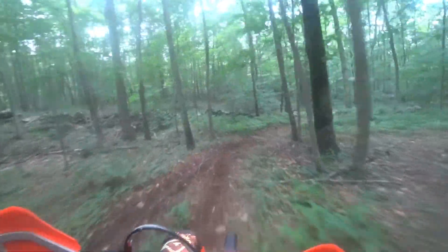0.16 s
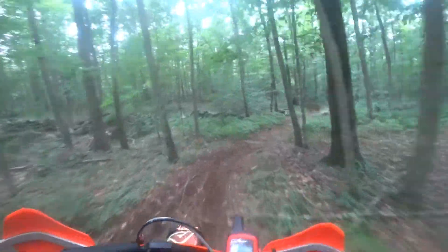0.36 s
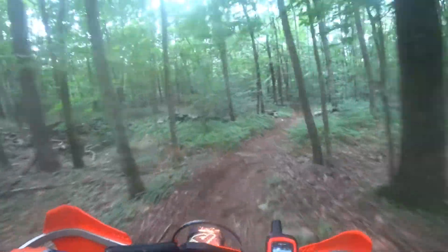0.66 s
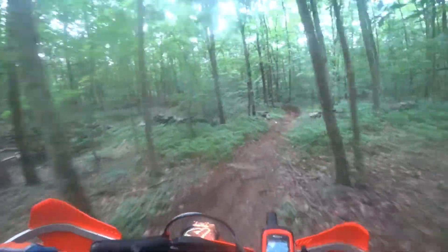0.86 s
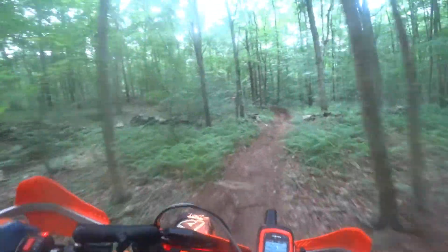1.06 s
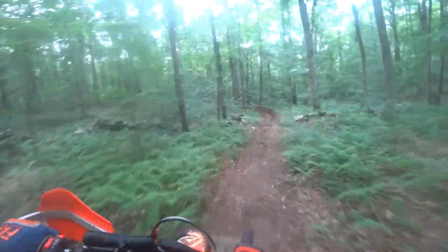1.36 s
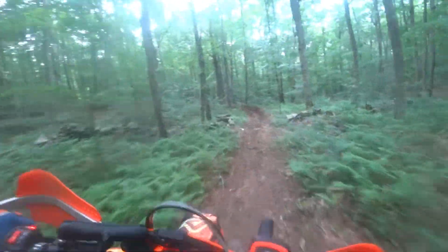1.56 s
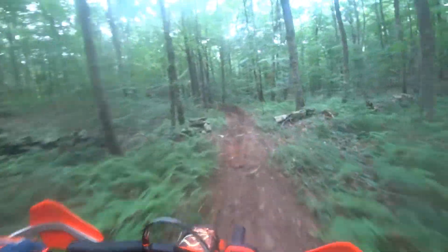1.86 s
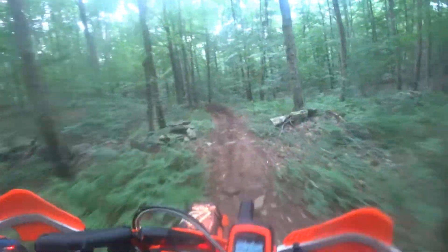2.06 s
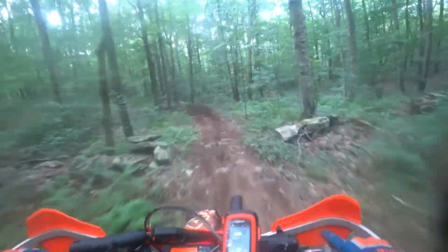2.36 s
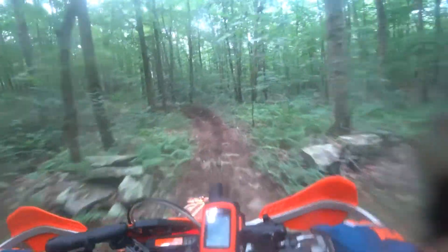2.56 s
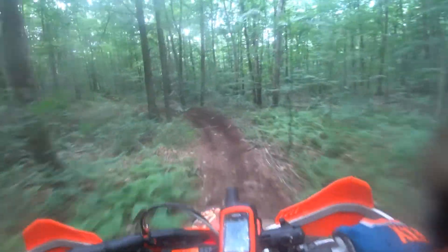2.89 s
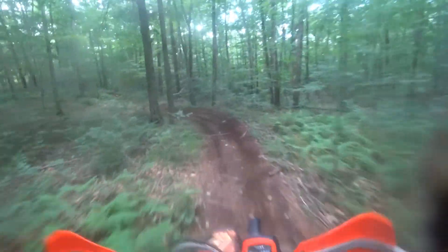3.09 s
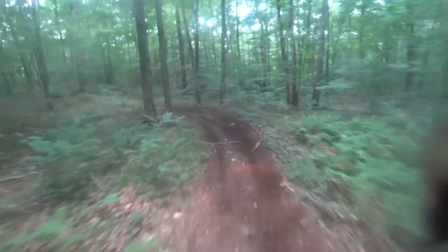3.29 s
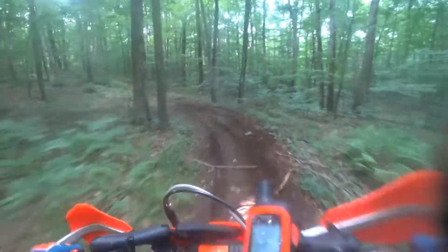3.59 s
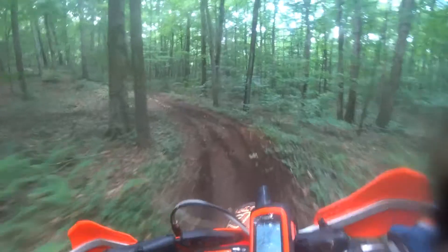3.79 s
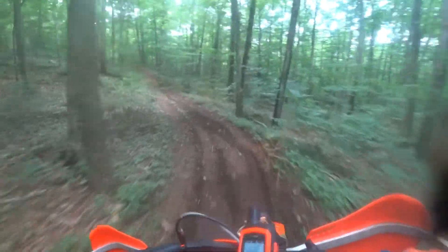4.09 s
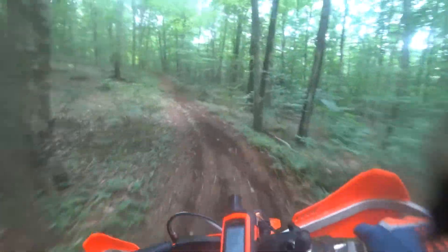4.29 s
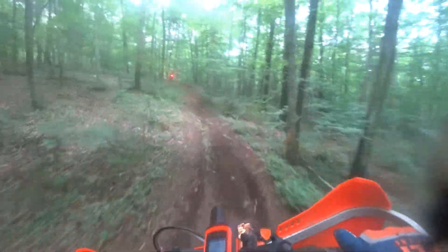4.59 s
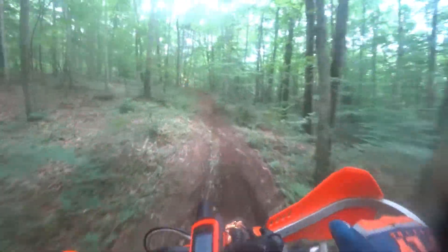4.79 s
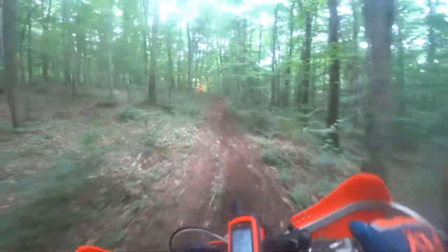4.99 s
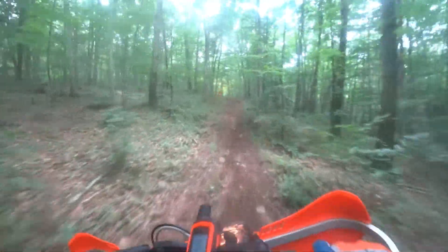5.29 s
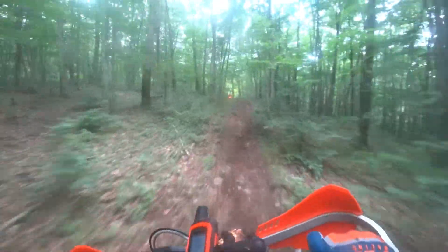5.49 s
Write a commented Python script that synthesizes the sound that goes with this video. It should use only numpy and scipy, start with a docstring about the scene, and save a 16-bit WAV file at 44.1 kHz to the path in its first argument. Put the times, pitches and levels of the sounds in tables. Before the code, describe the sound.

Close to a rider's helmet microphone, a dirt bike coasts with low buffeting air, faint droning engine and stray metallic pings. From just after one second come several raspy throttle blips. Then the throttle shuts, with deep thumps, chassis knocks and tiny brake squeaks, before the two-stroke catches and pulls upward in revs to the end.

```python
"""First a dirt bike coasts over a rough forest trail: a dull thud, rumbling air, a faint engine, odd pings.
Then come throttle blips, bumps with the throttle shut and short brake squeaks, and a pull from low revs.
Each firing of the two-stroke booms in the exhaust, pings in the pipe and rasps with gas and thin metal.
Coloured noise makes the air and the clatter; kicks set the ringing parts going.
All is heard from the rider's helmet, where air and jolts shake the microphone mount."""
import sys
import numpy as np
from scipy import signal
from scipy.fft import rfft, irfft, next_fast_len
from scipy.io import wavfile
from scipy.ndimage import uniform_filter1d

SR = 44100
rng = np.random.default_rng(int(sys.argv[2]) if len(sys.argv) > 2 else 0)


def pcm_store(signal):
    """Save signal as 16-bit PCM."""
    levels = np.round(np.clip(np.atleast_2d(signal), -1, 1) * 32767)
    wavfile.write(sys.argv[1], SR, levels.astype(np.int16).T)


N = 249165
TIME = np.arange(N) / SR


def from_db(db):
    """Turns decibels into a factor."""
    return 10 ** (np.asarray(db) / 20)


def rms_one(x):
    """Scales a sound to an overall rms of 1."""
    return x / np.sqrt(np.mean(x ** 2) + 1e-20)


def in_time(rows):
    """Reads each column of a time curve at every sample."""
    s, *columns = np.transpose(rows)
    return [np.interp(TIME, s, c) for c in columns]


def at_hz(points, hz):
    """Reads a spectrum on a log-frequency axis."""
    f, value = np.transpose(points)
    return np.interp(np.log(hz + 1), np.log(f), value)


# stereo width of all noises: f/Hz, side minus centre level/dB
STEREO_WIDTH = [(30, -18.5), (65, -5.5), (120, -1.5), (200, 7), (340, 11.5), (600, 12), (980, 7),
                (1300, 14), (1900, 2), (3500, 1.5), (4300, 5), (5600, 0.5), (10000, -4)]


def noise(spectrum):
    """Stereo noise of a given colour, silent from the spectrum's last frequency up; rms 1."""
    size = next_fast_len(N)
    hz = np.arange(size // 2 + 1) * SR / size
    width = from_db(at_hz(STEREO_WIDTH, hz))
    colour = from_db(at_hz(spectrum, hz)) * (hz < spectrum[-1][0])
    centre, side = rfft(rng.standard_normal((2, size))) * colour / np.hypot(1, width)
    left_right = [centre + width * side, centre - width * side]
    return rms_one(irfft(left_right, size)[:, :N])


def clicks(seconds, sizes):
    """Single-sample kicks at given times."""
    out = np.zeros(N)
    places = np.round(np.asarray(seconds) * SR).astype(int)
    np.add.at(out, np.clip(places, 0, N - 1), sizes)
    return out


def puffs(kicks, rise_s, fall_s):
    """Two smoothing steps turn each kick into a swell that dies away."""
    up, down = np.exp(-1 / (rise_s * SR)), np.exp(-1 / (fall_s * SR))
    return signal.lfilter([1 - up], [1, -up - down, up * down], kicks + 1e-18)


def body(drive, modes, sharpen=0.0):
    """Steep double-pole resonances, each reaching the two ears with its own phase and strength."""
    out, ears = np.zeros((2, N)), np.array([[.5], [-.5]])
    for hz, width_hz, db, phase, pan_db in modes:
        r = np.exp(-np.pi * width_hz / SR)
        pole = r * np.exp(2j * np.pi * hz / SR)
        # extra turning that bends the pitch by the share "sharpen"
        glide = np.exp(2j * np.pi * hz * np.cumsum(sharpen) / SR)
        ring = signal.lfilter([(1 - r) ** 2], [1, -2 * pole, pole ** 2], drive / glide + 1e-18)
        ring = glide * ring
        out += from_db(db + pan_db * ears) * np.real(ring * np.exp(-1j * phase * ears))
    return out


def struck(kicks, modes):
    """A body ringing so that a unit kick peaks at 1."""
    return body(kicks, modes) / np.abs(body(clicks([0], [1]), modes)).max()


def evened(x, window_s):
    """Holds the level of a noise steady by dividing by its short-term rms."""
    power = uniform_filter1d(np.mean(x ** 2, axis=0), max(int(window_s * SR), 2))
    return x / np.sqrt(power + 1e-6)


def burst(seconds, sizes, rough):
    """Pressure kicks, each trailed by a puff of turbulence; rough is the share of turbulence."""
    kicks = clicks(seconds, sizes)
    return kicks + rough * puffs(kicks, rise_s=.0008, fall_s=.006) * rng.standard_normal(N)


def dead_centres(speed, start, end):
    """The times at which the piston passes the top, once a turn from start to end."""
    turned = np.cumsum(speed * ((TIME > start) & (TIME < end))) / SR
    return TIME[1:][np.diff(np.ceil(turned)) > 0]


def voice(modes, pulling):
    """Picks the strengths that the resonances have in a blip or in the long pull."""
    return [(hz, width, pull_db if pulling else blip_db, phase, pan)
            for hz, width, blip_db, pull_db, phase, pan in modes]


TYPICAL_TURNS_PER_S = 45  # firing rate at which the levels of boom and ping hold


def resound(drive, modes, extra_db, sharpen=0.0):
    """Resonances of alternating sign, each with an extra gain; a run of unit kicks gives about rms 1."""
    out, power = 0, 0
    for k, (mode, db) in enumerate(zip(modes, extra_db)):
        gain = from_db(db)
        out = out + (-1) ** k * gain * body(drive, [mode], sharpen)
        power = power + (gain * from_db(mode[2])) ** 2 * np.pi * mode[1] / 8
    return out * SR / np.sqrt(power * TYPICAL_TURNS_PER_S)


# air buffeting the microphone: t/s, level/dB
AIR_LEVEL = [(0, -31), (.2, -31.5), (.5, -36), (.75, -39.5), (1.25, -32.5), (1.95, -39.5), (2.25, -31),
             (2.5, -32), (2.68, -27), (2.96, -30.5), (3.08, -34.5), (3.2, -28), (3.45, -33.5),
             (3.75, -35.5), (4.25, -38), (4.8, -49), (5.16, -30), (5.65, -55)]
# colour of the air noise: f/Hz, relative level/dB per Hz
AIR_COLOUR = [(25, 18), (48, 0.5), (64, 5.5), (85, -2), (125, 2.5), (180, 0), (280, -7.5), (500, -43),
              (1200, -80)]


def air():
    """Air tumbles over the microphone ports: deep noise that follows a level curve."""
    level_db, = in_time(AIR_LEVEL)
    return evened(noise(AIR_COLOUR), window_s=0.052) * from_db(level_db)


# sway of the mount between jolts: t/s, level/dB
SWAY_LEVEL = [(0, -24.5), (.7, -29.5), (1.0, -35), (1.7, -28.5), (2.2, -30.5), (2.48, -32.5), (2.65, -23),
              (3.05, -32), (3.4, -25), (3.6, -17), (4.0, -27), (4.3, -29), (4.5, -25), (4.75, -27.5),
              (5.65, -25.5)]
# colour of the sway: f/Hz, relative level/dB per Hz
SWAY_COLOUR = [(12, 2.5), (24, 7.5), (33, -22), (40, 1.5), (50, -12.5), (66, -14), (90, -33), (150, -90)]
# bumps in the trail that set the mount ringing: t/s, peak level/dB
MOUNT_JOLTS = [(0.168, -27), (0.483, -23.5), (1.335, -25), (1.527, -20.5), (1.806, -13.5), (2.04, -16.5),
               (2.299, -21), (2.773, -19.5), (3.2, -22.5), (3.442, -6), (3.647, -12.5), (3.791, -16.5),
               (4.361, -18), (4.859, -22)]
# low resonance of the mount: f/Hz, width/Hz, level/dB, left-ear lag/rad, left minus right level/dB
MOUNT_RESONANCE = [(33.22, 9, 0, 0.77, -2.5)]


def mount():
    """The microphone mount sways as very low noise and rings at its own low pitch after each jolt."""
    sway_db, = in_time(SWAY_LEVEL)
    s, jolt_db = np.transpose(MOUNT_JOLTS)
    sway = evened(noise(SWAY_COLOUR), window_s=0.074) * from_db(sway_db)
    return sway + struck(clicks(s, from_db(jolt_db)), MOUNT_RESONANCE)


# the suspension taking a bump: t/s, peak level/dB
SUSPENSION_THUMPS = [(0.148, -37), (0.469, -43), (1.216, -45), (1.383, -28), (2.069, -40), (2.6, -28),
                     (3.421, -17), (3.48, -24), (3.81, -25), (3.937, -30), (4.361, -33)]
# its resonance: f/Hz, width/Hz, level/dB, left-ear lag/rad, left minus right level/dB
SUSPENSION_RESONANCE = [(74, 47, 0, 2.9, 0.93)]


def suspension():
    """Each bump kicks one low, quickly dying resonance."""
    s, level_db = np.transpose(SUSPENSION_THUMPS)
    return struck(clicks(s, from_db(level_db)), SUSPENSION_RESONANCE)


# the chassis hitting roots and stones: t/s, thud peak level/dB, click strength/dB
CHASSIS_KNOCKS = [(0.061, -21, -57), (1.389, -40, -58), (1.993, -26, -43), (2.679, -17.5, -56),
                  (2.955, -38, -68), (3.138, -22, -61), (3.216, -25, -65), (3.252, -31, -59),
                  (3.409, -26, -57), (3.433, -14.5, -47), (4.201, -25, -55), (5.154, -23, -49)]
# its resonances: f/Hz, width/Hz, relative level/dB, left-ear lag/rad, left minus right level/dB
CHASSIS_RESONANCES = [(68, 60, -5, 2.3, 9), (152.5, 132, -2, 2.53, 1), (292, 102, -3, 2.62, -1.5)]


def knocks():
    """The chassis thuds dully, and a moment later its loose parts click as a tiny puff of noise."""
    s, thud_db, click_db = np.transpose(CHASSIS_KNOCKS)
    thud = struck(clicks(s, from_db(thud_db)), CHASSIS_RESONANCES)
    click = puffs(clicks(s + 0.0058, from_db(click_db)), rise_s=0.0002, fall_s=0.0031)
    return thud + click * noise([(800, -18), (1500, -3), (3000, 6), (6000, -6), (11200, -5)])


BRAKE_HZ = 3615
# brake squeaks: t/s, length/s, level/dB
BRAKE_SQUEAKS = [(3.163, 0.01, -67), (3.184, 0.0086, -81), (3.237, 0.008, -62), (3.97, 0.0061, -60.5)]
# the pad rubbing lightly: t/s, level/dB
BRAKE_RUB_LEVEL = [(3.5, -90), (3.65, -76), (4.3, -73), (4.6, -75), (4.85, -66), (5.3, -65), (5.4, -90)]


def brake(width_hz=70, rub_width_hz=260, flutter_per_s=40):
    """A pad sets the disc singing for a moment, then rubs with a scattered, fluttering ring."""
    swell = sum(from_db(db) * np.exp(-.5 * ((TIME - s) / length) ** 2) for s, length, db in BRAKE_SQUEAKS)
    squeak = swell * rms_one(body(rng.standard_normal(N), [(BRAKE_HZ, width_hz, 0, 1.3, 0)]))
    touches = puffs(1.0 * (rng.random(N) < flutter_per_s / SR), rise_s=0.0023, fall_s=0.011)
    rub = rms_one(body(touches * rng.standard_normal(N), [(BRAKE_HZ, rub_width_hz, 0, 1.3, 0)]))
    return squeak + rub * from_db(in_time(BRAKE_RUB_LEVEL)[0])


IDLE_TURNS_PER_S, PULL_START_S = 31.2, 4.651
# levels at idle, growth with the revs, and extra drone in the pull
DRONE_DB, DRONE_DB_PER_OCTAVE, DRONE_PULL_DB = -41.5, 4, 2.5
CLATTER_DB, CLATTER_DB_PER_OCTAVE = -54, 1
# levels that do not follow the revs
PUMPING_DB, METAL_RATTLE_DB, MURMUR_DB = -50.5, -60, -60
MURMUR_ORDER = 4  # cycles per turn
# colours of the drone and of piston and chain: f/Hz, relative level/dB per Hz
DRONE_COLOUR = [(120, 1.5), (220, -3), (350, 5.5), (455, 9), (560, 2), (650, 4.5), (780, -3), (950, 1),
                (1100, -3), (1300, -6), (1700, -32), (3000, -67)]
CLATTER_COLOUR = [(700, 2), (1300, 5.5), (1650, 8), (1850, 1.5), (2300, 0), (3050, -4), (3550, -1.5),
                  (4000, -6.5), (4700, -3.5), (5700, -5.5), (7600, -17), (9700, -18.5), (9920, -30),
                  (10150, -12.5), (11200, -24)]
# thin metal of cylinder and pipe wall, which also rings under a firing:
# f/Hz, width/Hz, relative level/dB, left-ear lag/rad, left minus right level/dB
THIN_METAL = [(1832, 66, 4.5, 2.5, -7), (2180, 147, -1.5, 3.45, 3.5), (3478, 96, -8, 1.33, 0.5),
              (5480, 58, -17, 4.9, -24), (9850, 45, -12.5, 1.3, 9.5)]


def coasting(speed, throb=0.67, rattle=0.32):
    """The turning engine pumps air, drones and murmurs while piston and chain rattle; no firing needed."""
    octaves = np.log2(speed / IDLE_TURNS_PER_S)
    turns = dead_centres(speed, 0, TIME[-1])
    beats = clicks(turns, np.ones(len(turns)))
    strokes = beats * from_db(rng.uniform(-18.4, 8, N))
    links = (rng.random(N) < 110 / SR) * from_db(rng.uniform(-8, 8, N))  # about 110 chain kicks a second

    drone = rms_one((1 + throb * puffs(strokes, rise_s=0.00045, fall_s=0.023)) * noise(DRONE_COLOUR))
    drone_db = DRONE_DB + DRONE_DB_PER_OCTAVE * octaves + DRONE_PULL_DB * (TIME > PULL_START_S)
    rattling = 1 + rattle * puffs(strokes + links, rise_s=0.00013, fall_s=0.0088)
    clatter = rms_one(rattling * noise(CLATTER_COLOUR))
    clatter_db = CLATTER_DB + CLATTER_DB_PER_OCTAVE * octaves

    tone = np.sin(2 * np.pi * MURMUR_ORDER * np.cumsum(speed) / SR + np.array([[0], [2.0]]))
    murmur = rms_one(puffs(beats * rng.random(N), rise_s=0.01, fall_s=0.0051) * tone)
    ringing = rms_one(body(strokes + links, THIN_METAL))
    # unfired strokes puff through the exhaust
    pumping = resound(beats * rng.random(N), voice(EXHAUST_MODES, False), np.zeros(len(EXHAUST_MODES)))

    steady = (pumping * from_db(PUMPING_DB) + ringing * from_db(METAL_RATTLE_DB)
              + murmur * from_db(MURMUR_DB))
    return steady + drone * from_db(drone_db) + clatter * from_db(clatter_db)


# stray firings with the throttle shut, before the offsets below: t/s, ping level/dB, crack level/dB
STRAY_FIRINGS = [(0.059, -37, -60), (0.407, -43, -72), (0.555, -37, -59), (0.724, -37.5, -56.5),
                 (0.915, -45, -64), (1.053, -39, -58), (2.683, -38, -55), (2.841, -35.5, -54.5),
                 (3.005, -38, -58.5), (3.119, -36.5, -58.5), (3.269, -42.5, -67), (3.389, -36, -61),
                 (3.539, -36, -57), (3.742, -42.5, -67), (3.896, -34, -55), (4.07, -33, -55),
                 (4.283, -37, -57), (4.433, -33.5, -60), (4.572, -31.5, -53.5)]


def stray_firings(kick_db=-5, spit_db=15.0, boom_db=-5, rough=0.046, varied_db=2.5):
    """A lone weak firing pings the pipe in a varying colour and thumps the exhaust in a short spit of gas."""
    s, ping_db, crack_db = np.transpose(STRAY_FIRINGS)
    drive = burst(s - .001, from_db(ping_db + kick_db), rough)
    variation_db = varied_db * rng.standard_normal((len(s), len(PIPE_MODES)))
    colours = [np.interp(TIME, s, column) for column in variation_db.T]
    ping = resound(drive, voice(PIPE_MODES, False), colours)
    boom = resound(drive, voice(EXHAUST_MODES, False), np.zeros(len(EXHAUST_MODES)))
    spit = puffs(clicks(s - .007, from_db(crack_db + spit_db)), rise_s=0.0026, fall_s=0.016)
    gas = noise([(300, 20.0), (900, 23.5), (1500, 13), (3000, 4.0), (5600, 9.5), (7500, -2.0),
                 (11200, -4.0)])
    return ping + from_db(boom_db) * boom + spit * gas


RUN_ON_S = 0.091  # firing goes on this long after the throttle shuts


def firings(speed):
    """The engine catches as the throttle opens and runs on briefly after it shuts."""
    starts = [blip[0] for blip in THROTTLE_BLIPS] + [PULL_START_S]
    # a run stops at least half an idle turn before the next one starts
    ends = [min(blip[1] + RUN_ON_S, following - .5 / IDLE_TURNS_PER_S)
            for blip, following in zip(THROTTLE_BLIPS, starts[1:])]
    runs = zip(starts, ends + [TIME[-1]])
    return np.concatenate([dead_centres(speed, start, end) for start, end in runs])


FIRST_FIRING_DB = -4.5  # shortfall at the start of a blip
# short openings of the throttle: opening t/s, shutting t/s, build-up/s,
# then on shutting: boom level/dB, ping level/dB, rasp level/dB
THROTTLE_BLIPS = [(0.0, 0.28, 0.018, -43, -51.5, -64.5), (1.222, 1.312, .003, -29, -40.5, -51.5),
                  (1.465, 1.643, 0.0092, -25, -40, -48.5), (1.78, 1.898, 0.079, -22.5, -37, -49),
                  (2.001, 2.14, 0.0043, -31, -46, -56.5), (2.1411, 2.394, 0.0034, -24.5, -38.5, -49.5)]
# effort in the long pull: t/s, boom level/dB, ping level/dB, rasp level/dB
PULL_EFFORT = [(4.651, -24, -38.5, -44.5), (4.7, -20.5, -35.5, -51), (4.8, -28.5, -38.5, -52),
               (4.98, -27.5, -40.5, -53), (5.08, -24, -38.5, -53), (5.27, -25.5, -40.5, -52.5),
               (5.43, -27.5, -40.5, -54), (5.57, -24, -36.5, -50), (5.65, -26.5, -34.5, -50)]
# growth with the revs [dB per octave] of boom, ping, rasp
REV_GROWTH = [3.5, 9, 9]
# dying away once the throttle shuts [dB per s] of boom, ping, rasp
SHUT_RELEASE = [229, 136, 107]


def effort(speed):
    """Gains of boom, ping and rasp: a build-up, growth with the revs, a release."""
    growth_db, release_db = np.array(REV_GROWTH)[:, None], np.array(SHUT_RELEASE)[:, None]
    gains = from_db(in_time(PULL_EFFORT)) * (TIME >= PULL_START_S)
    for start, shut, build_s, *level_db in THROTTLE_BLIPS:
        octaves = np.log2(speed / np.interp(shut, TIME, speed)) * (TIME < shut)
        weak_db = FIRST_FIRING_DB * (1 - np.clip((TIME - start) / build_s, 0, 1) ** 2)
        db = np.array(level_db)[:, None] + weak_db + growth_db * octaves
        db = db - release_db * np.clip(TIME - shut, 0, 1)
        gains = np.maximum(gains, from_db(db) * (TIME >= start))
    return gains


# the honk while the engine lugs at the start of the pull
LUG_HZ, LUG_DB, LUG_S = 330, 6.5, 0.58
HEAT_RISE_PER_OCTAVE = 0.16  # share of pitch
# exhaust resonances: f/Hz, width/Hz, relative level/dB in blips, relative level/dB in the pull,
# left-ear lag/rad, left minus right level/dB
EXHAUST_MODES = [(242, 97, 0.5, -2.5, 2.76, 2), (331.3, 25, 1, 3.5, 2.76, 2.5),
                 (411.3, 103, 2, -1.5, 2.73, -0.5), (508, 65, -8, -7, 3.02, -4.5),
                 (666, 125, -8.5, -8, 3.537, -1)]
# voice against revs; the middle hollows out at high revs:
# crank speed/turns per s, low level/dB, middle level/dB, high level/dB
EXHAUST_VOICING = [(32.8, 1, 5, -2), (37.4, -4, -2.5, -1.5), (45, 1.5, 3.5, -0.5), (48, 3.5, 0, 4),
                   (54, 0.5, 1, 4)]
# centres of the low, middle and high regions: f/Hz
VOICING_CENTRES = [260, 340, 420]


def exhaust(drive, speed, pulling, lug_octaves=0.11):
    """The modes swell and fade with the revs, sharpen as the gas heats, and honk while the engine lugs."""
    revs, *regions = np.transpose(EXHAUST_VOICING)
    regions_db = np.array([np.interp(speed, revs, column) for column in regions])
    lug_db = LUG_DB * pulling * np.exp(-((TIME - PULL_START_S) / LUG_S) ** 2)
    extra_db = []
    for hz, *_ in EXHAUST_MODES:
        shares = np.array([np.interp(hz, VOICING_CENTRES, row) for row in np.eye(len(regions))])
        closeness = np.exp(-(np.log2(hz / LUG_HZ) / lug_octaves) ** 2)
        extra_db.append(shares @ regions_db + lug_db * closeness)
    # heat is how far the revs stand above their mean over the last quarter second
    recent = uniform_filter1d(speed, SR // 4, mode="nearest", origin=SR // 8 - 1)
    heat = np.log2(speed / recent)
    return resound(drive, voice(EXHAUST_MODES, pulling), extra_db, HEAT_RISE_PER_OCTAVE * heat)


PING_ROUGH = .014  # share of turbulence in a kick
# the pipe's far end repeats the ping
PIPE_ECHO_S, PIPE_ECHO_DB = 0.007, -6
# each kick reaches the tailpipe a moment later; the open end sends it back inverted
TAILPIPE_S, REFLECTION_S, REFLECTION_DB = 0.002846, 0.005546, -8
# the higher pipe resonance reaches its level at this crank speed
PIPE_TOP_DB, PIPE_TOP_TURNS_PER_S, PIPE_TOP_DB_PER_OCTAVE = -8.5, 57, 22
# pipe wall resonances: f/Hz, width/Hz, relative level/dB in blips, relative level/dB in the pull,
# left-ear lag/rad, left minus right level/dB
PIPE_MODES = [(907, 94, -18, -14, 2.27, 7.5), (968, 167, 2.5, 4, 2.47, 4), (1103, 68, 3.5, -1.5, 3.07, 3),
              (1350, 110, -10, -28, 2.85, 0.5), (1680, 80, -14, -26, 3.84, -11),
              (1852, 200, -17, -13, 3.2, -6), (2117, 170, -18.5, -29, 3.7, 3.5),
              (3370, 160, -31, -32, 1.54, 1)]
# higher pipe resonance that joins in as the revs climb:
# f/Hz, width/Hz, level/dB, left-ear lag/rad, left minus right level/dB
PIPE_TOP_MODE = [(1152, 89, 0, 2.63, 2.4)]


def combustion(fired, speed, boom_gain, ping_gain, pulling):
    """Each firing pings the pipe wall, then booms from the tailpipe; ragged in blips, more even in the pull."""
    jitter_s, uneven_db, rough = (.00002, .8, .01) if pulling else (.00005, 1.4, .022)
    chance = rng.standard_normal((len(fired), 3))
    boom_size = np.interp(fired, TIME, boom_gain) * from_db(uneven_db * chance[:, 0])
    ping_size = np.interp(fired, TIME, ping_gain) * from_db(uneven_db * chance[:, 1])
    s = fired + jitter_s * chance[:, 2]

    reflection = clicks(s + TAILPIPE_S + REFLECTION_S, boom_size * from_db(REFLECTION_DB))
    blast = burst(s + TAILPIPE_S, boom_size, rough) - reflection
    echo = clicks(s + PIPE_ECHO_S, ping_size * from_db(PIPE_ECHO_DB))
    sharp = burst(s, ping_size, PING_ROUGH) + echo

    below_top = np.minimum(np.log2(speed / PIPE_TOP_TURNS_PER_S), 0)
    top_db = PIPE_TOP_DB + PIPE_TOP_DB_PER_OCTAVE * below_top
    ping = resound(sharp, voice(PIPE_MODES, pulling), np.zeros(len(PIPE_MODES)))
    top = from_db(top_db) * resound(sharp, PIPE_TOP_MODE, [0])
    return exhaust(blast, speed, pulling) + ping + top


# the gas starts this long before each firing; the rasp and throb gains are smoothed over RASP_SWELL_S
RASP_LEAD_S, RASP_SWELL_S = 0.0052, 0.015
METAL_RING_DB = -10  # relative to the gas noise
# colour of the rasping gas: f/Hz, relative level/dB per Hz
RASP_COLOUR = [(800, -28), (1100, 2), (1300, 10.5), (1600, 9), (1950, 7.5), (2500, 0.5), (3050, 0),
               (3600, -1.5), (4200, -1.5), (5400, 0), (6300, -4), (7600, -11), (11200, -14.5)]


def engine(speed, rasp_pulse=1.0, throb_db=-10.0):
    """One firing a turn: boom and ping, a rasp of gas, a ring of thin metal and the throb of the crank."""
    fired = firings(speed)
    boom_gain, ping_gain, rasp_gain = effort(speed)
    in_pull = fired >= PULL_START_S
    tone = combustion(fired[~in_pull], speed, boom_gain, ping_gain, False)
    tone = tone + combustion(fired[in_pull], speed, boom_gain, ping_gain, True)

    gas = clicks(fired - RASP_LEAD_S, np.ones(len(fired)))
    blow = puffs(gas, rise_s=0.0038, fall_s=0.041) + rasp_pulse * puffs(gas, rise_s=0.0017, fall_s=0.0085)
    ring = rms_one(body(burst(fired, np.ones(len(fired)), PING_ROUGH), THIN_METAL))
    rasp = rms_one(blow * noise(RASP_COLOUR)) + from_db(METAL_RING_DB) * ring
    throb = from_db(throb_db) * np.sin(2 * np.pi * np.cumsum(speed) / SR + np.array([[0], [1.4]]))
    swell = max(int(RASP_SWELL_S * SR), 2)
    return tone + throb * uniform_filter1d(boom_gain, swell) + rasp * uniform_filter1d(rasp_gain, swell)


# the revs: t/s, crank speed/turns per s
CRANK_SPEED = [(0, 44), (.28, 39.7), (1.22, 32), (1.29, 37.5), (1.325, 45), (1.37, 38.5), (1.46, 28.5),
               (1.55, 36), (1.595, 42), (1.64, 50), (1.69, 56.5), (1.72, 56.5), (1.78, 42.9), (1.83, 44),
               (1.89, 52.9), (1.96, 57.6), (2.01, 47), (2.12, 39.8), (2.16, 41.9), (2.23, 44.2), (2.32, 52),
               (2.44, 59), (2.75, 46), (3.4, 36), (4.62, 32.5), (4.651, 38), (4.69, 45.5), (4.73, 44.7),
               (4.78, 42.4), (4.85, 41.3), (4.93, 41.7), (5.05, 42.6), (5.11, 44.7), (5.16, 44.6),
               (5.22, 45.6), (5.32, 45.5), (5.4, 46.1), (5.46, 47.6), (5.55, 50.5), (5.65, 54)]


def scene():
    """The rumble of the ride, and the bike just below the rider, a touch stronger on the left."""
    speed, = in_time(CRANK_SPEED)
    rumble = air() + mount()
    bike = suspension() + knocks() + brake() + coasting(speed) + stray_firings() + engine(speed)
    return rumble + bike * from_db([[.3], [-.3]])


CUTOFF_HZ = 11150


def record(dry):
    """The deepest sway is weakened and the top is cut steeply."""
    dry = signal.sosfilt(signal.butter(1, 10, "high", fs=SR, output="sos"), dry)
    return signal.sosfilt(signal.ellip(12, .1, 80, CUTOFF_HZ, fs=SR, output="sos"), dry)


dry = scene()
out = record(dry)
pcm_store(out)
```